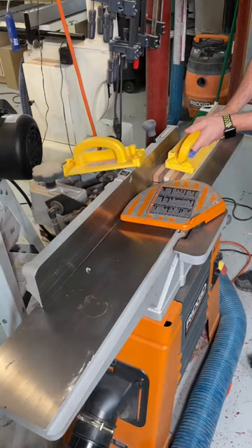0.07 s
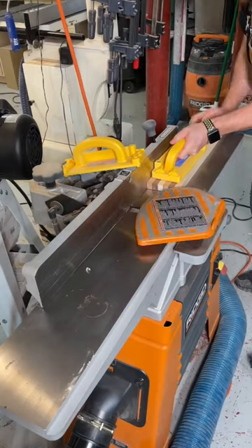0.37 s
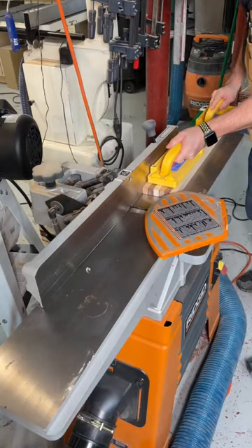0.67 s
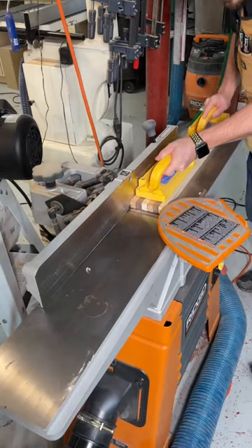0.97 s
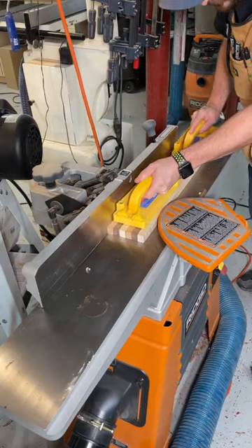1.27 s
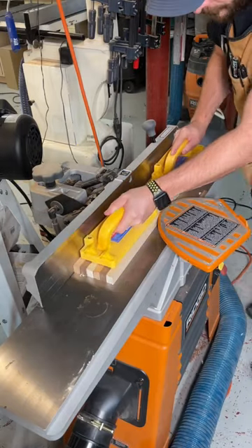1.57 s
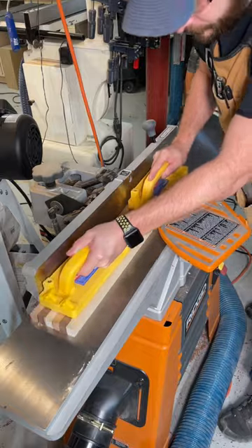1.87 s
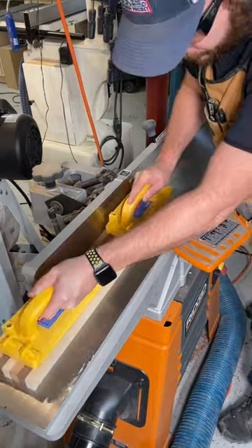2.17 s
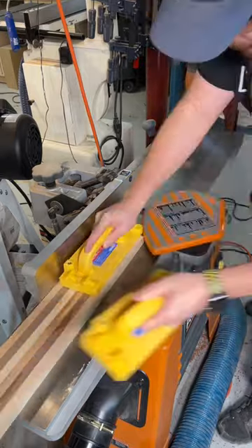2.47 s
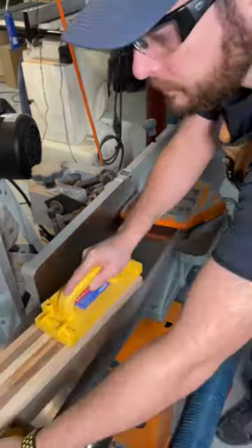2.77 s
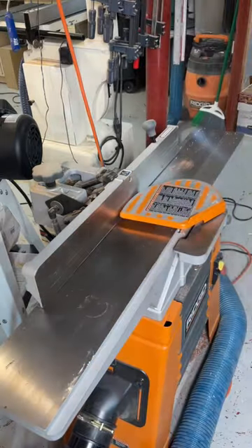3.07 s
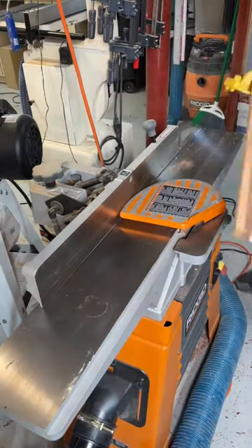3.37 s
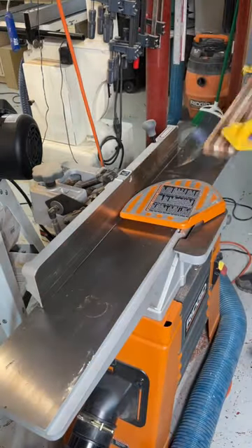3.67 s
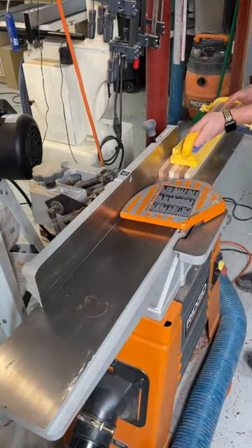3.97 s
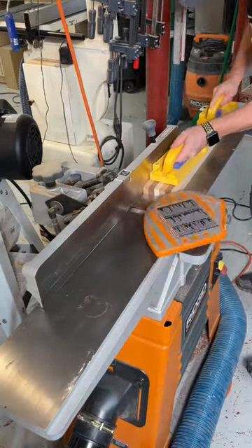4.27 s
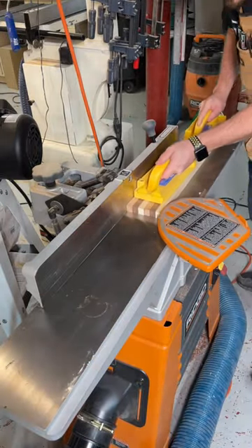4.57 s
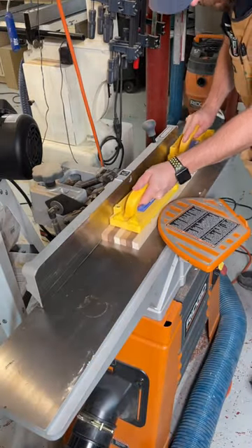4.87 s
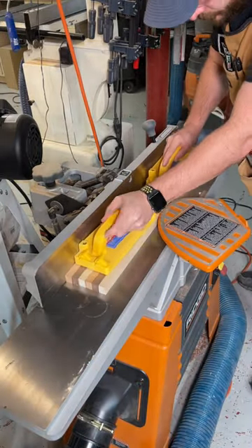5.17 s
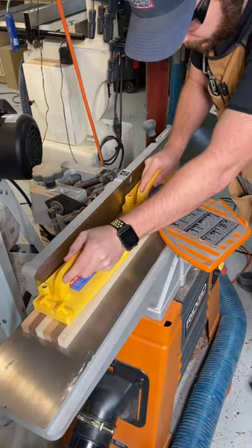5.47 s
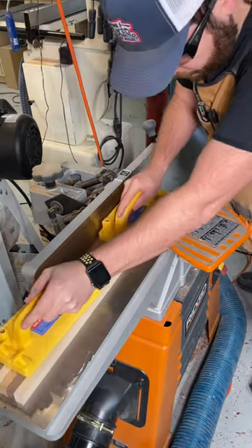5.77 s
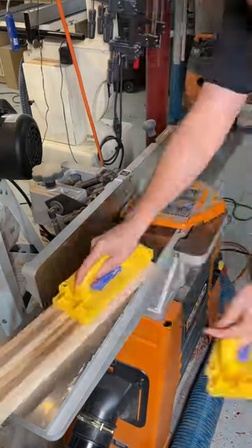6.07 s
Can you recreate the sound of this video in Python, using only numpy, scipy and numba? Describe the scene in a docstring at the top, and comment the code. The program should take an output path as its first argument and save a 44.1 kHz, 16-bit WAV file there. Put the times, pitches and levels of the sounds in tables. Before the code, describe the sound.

A jointer screams through two quick passes on a board over a whining dust collector, sped up, high and thin.

```python
"""A small workshop, with a phone for a microphone: a jointer planes a glued-up board twice.
It is heard sped up, so everything is high and thin. The knives whistle in air and scream in the wood,
over the whine and rush of a dust collector; the guard snaps shut after each pass. The phone's gain
control ducks during the cuts and creeps back up between them."""
import sys
import numpy as np
from scipy import signal
from scipy.fft import rfft, irfft
from scipy.io import wavfile
from scipy.ndimage import uniform_filter1d, map_coordinates
from numba import njit

SR = 44100
rng = np.random.default_rng(int(sys.argv[2]) if len(sys.argv) > 2 else 0)


def transcribe(signal):
    """Save signal, clipped to [-1, 1], as a 16-bit WAV file at the path in sys.argv[1]."""
    frames = np.atleast_2d(signal).T
    limited = np.clip(frames, -1, 1)
    pcm = np.round(limited * 32767).astype(np.int16)
    wavfile.write(sys.argv[1], SR, pcm)


N = 273861
T = np.arange(N) / SR

# The dust collector's impeller. Each row: multiple of the blade rate, level in dB.
IMPELLER_PARTIALS = [(1, -39), (2, -56), (3, -63), (4, -61)]
# Motor hum and frame tones. Each row: frequency in Hz, level in dB.
MOTOR_TONES = [(355.5, -85), (426, -88), (721, -75.5), (1040, -68), (1442, -67), (2880, -56), (3209, -72.5),
               (3520, -72.5), (14314, -60)]
# Air rushing into the hose. Each row: frequency in Hz, relative level in dB.
AIR_SPECTRUM = [(250, -55), (340, -41), (520, -31.5), (750, -15), (1080, -4.5), (1800, -8.5), (2400, -1.5),
                (3700, 4.5), (5400, -3), (7000, -1.5), (8600, -2.5), (9800, -9.5), (12000, -9.5),
                (15500, -11.5)]
# Knives in air. Each row: multiple of the strike rate, relative dB under the guard, and uncovered.
WHISTLE_PARTIALS = [(1, -64.5, -62), (2, -48, -47.5), (3, -50, -50), (4, -54, -54), (5, -48.5, -46),
                    (6, -58.5, -54.5), (7, -57, -52), (8, -60.5, -68.5), (9, -70, -57), (10, -61.5, -57)]
# The guard's swings. Each row: second it is pushed aside, second it is shut again.
GUARD_SWINGS = [(0.348, 2.7), (4.05, 6.065)]
# Guard, push blocks and board knocking. Each row: start in seconds, level in dB, the crack's
# 60 dB decay time in seconds, its low cut in Hz.
KNOCK_EVENTS = [(0.501, -33.5, 0.039, 10000), (0.621, -31, .025, 7000), (2.5846, -11, 0.019, 3930),
                (2.826, -27, 0.0095, 5970), (2.847, -28, .02, 6000), (3.347, -33, .02, 6000),
                (3.5127, -21.5, 0.017, 4790), (3.5483, -23.5, 0.011, 4400), (3.9086, -29, 0.015, 5000),
                (6.0647, -8, 0.013, 4700)]
# Modes of the machine's table and fence. Each row: frequency in Hz, width in Hz, relative level in dB.
MACHINE_MODES = [(4250, 39, -7), (5280, 83, 3.5), (7570, 130, 3.5), (8700, 74, 3), (11200, 140, 4),
                 (11600, 74, -12), (14200, 110, -7)]
# The board's passes. Each row: bite, full cut and exit in seconds, then offsets in dB for the low and
# body registers, the chips, the buzz and the chatter.
BOARD_PASSES = [(1.002, 1.052, 2.340, 1, -1, -4, -6), (4.519, 4.548, 5.875, -3, 0.5, -4.5, 0.5)]
# The cutter head under load, one list a pass. Each row: time in seconds, strike rate in Hz.
LOADED_SPEEDS = [
    [(1.03, 1476.2), (1.05, 1471.5), (1.14, 1471.0), (1.28, 1461.2), (1.35, 1464.9), (1.75, 1459.0),
     (2.05, 1465.9), (2.23, 1463.1), (2.33, 1466.9)],
    [(4.54, 1466.5), (4.61, 1459.0), (4.86, 1446.7), (4.91, 1450.0), (5.05, 1448.9), (5.08, 1455.4),
     (5.22, 1449.7), (5.85, 1454.9), (5.87, 1459.1)],
]
# The scream, one list a register: low, body, middle, top.
# Each row: multiple of the strike rate, level in dB within the register.
SCREAM_PARTIALS = [
    [(2, -15), (3, 0)],
    [(4, 1)],
    [(5, -1), (6, -0.5)],
    [(7, -8), (8, -8), (9, -5.5), (10, -10)],
]
# Course of a cut for those four registers, then the chips. Each row: steady relative level in dB,
# change at the bite in dB, its fade time in seconds, change at the exit in dB.
CUT_ENVELOPES = [(-46.5, 13, 0.42, 5.5), (-37.5, -9, 0.069, 2), (-37, 12, 0.049, -2.5),
                 (-37, 19.5, 0.043, 8), (-46.5, 10, 0.27, 7.5)]
# The push eases or firms, or the knives meet rough grain. Each row: centre in seconds,
# half length in seconds, change of the scream in dB, change of the chips in dB.
PUSH_AND_GRAIN = [(1.175, 0.047, -3, -6), (1.312, 0.063, 4.5, -3), (1.47, 0.11, -3, -0.5),
                  (1.705, 0.14, 0, 5), (1.9, .05, 2, 1), (4.653, 0.047, -3, 4), (4.733, 0.031, -4.5, -9.5),
                  (5.036, 0.1, -2, 0.5), (5.297, 0.17, 2.5, 4.5), (5.713, 0.067, -5, 1)]
# Chips tearing off. Each row: frequency in Hz, relative level in dB.
CHIP_SPECTRUM = [(2000, -16), (3000, -16), (3650, -5.5), (4200, -5), (5100, -0.5), (5600, 0), (6600, 2.5),
                 (7700, -0.5), (9400, 0.5), (10600, -2.5), (12300, 3), (15400, -3.5)]
# Big splinters at the board's ends. Each row: time in seconds, size relative to an average snap.
BIG_SPLINTERS = [(4.566, 2.8), (4.599, 2), (5.836, 2.7), (5.849, 4)]
# Difference between the two microphone ports. Each row: frequency in Hz, side over mid in dB.
PORT_DIFFERENCE = [(300, -26), (700, -45), (1300, -52), (2100, -56), (3000, -14.5), (4300, -11),
                   (6000, -20), (8000, -38.5), (15000, -21)]


def undb(db):
    """Decibels to amplitude."""
    return 10 ** (np.asarray(db) / 20)


def unit(x):
    """Scale to rms 1."""
    return x / np.sqrt(np.mean(x ** 2))


def colour(x, points):
    """Filter by a spectrum of (Hz, dB) points."""
    hz, db = np.transpose(points)
    bins = np.maximum(np.fft.rfftfreq(N, 1 / SR), 1)
    return irfft(rfft(x) * undb(np.interp(np.log(bins), np.log(hz), db)), N)


def highpass(x, hz, order):
    """Butterworth high-pass."""
    return signal.sosfilt(signal.butter(order, hz, "high", fs=SR, output="sos"), x)


def walk(rate):
    """Smooth random wander, `rate` steps a second, spread about 1."""
    steps = rng.standard_normal(N // 10)
    return map_coordinates(steps, [T * rate + 2], order=2, mode="wrap")


def ramp(start_s, length_s):
    """Rise from 0 to 1 over this time."""
    return np.clip((T - start_s) / length_s, 0, 1)


def turning(hz):
    """Phase of something that turns at this rate."""
    return 2 * np.pi * np.cumsum(hz * np.ones(N)) / SR


def tone(phase):
    """A sine of rms 1 that starts anywhere in its cycle."""
    return np.sqrt(2) * np.cos(phase + 2 * np.pi * rng.random())


def whine(phase, partials, sway_db, sway_rate):
    """Harmonics of a rotor; each sways as the worker moves through the sound field."""
    return sum(undb(db + sway_db * walk(sway_rate)) * tone(k * phase) for k, db in partials)


def dust_collector(blade_hz=2139.7, air_db=-40.7):
    """The bed of the room: impeller whine, motor hum and air rushing into the hose."""
    impeller = whine(turning(blade_hz + 0.63 * walk(21)), IMPELLER_PARTIALS, sway_db=0.5, sway_rate=23)
    hum = sum(undb(db + 0.5 * walk(15)) * tone(turning(hz)) for hz, db in MOTOR_TONES)
    air = unit(colour(rng.standard_normal(N), AIR_SPECTRUM)) * undb(air_db + 0.35 * walk(13))
    return impeller + hum + air


def cutter_head(idle_hz=1485.8, recover_s=0.0272):
    """Phase of the knife strikes: the board drags the head down, and it picks up as the board leaves."""
    speeds = [(0, idle_hz)]
    for (bite, _, leave, *_), loaded in zip(BOARD_PASSES, LOADED_SPEEDS):
        speeds += [(bite, idle_hz), *map(tuple, loaded), (leave + recover_s, idle_hz)]
    strike_hz = np.interp(T, *np.transpose(sorted(speeds)))
    return turning(strike_hz + 0.72 * walk(20))


def knife_whistle(phase, gain_db=0.5, open_s=0.18, shut_s=0.057):
    """Knives whistle in air; the guard muffles most upper partials until the board pushes it aside."""
    aside = sum(ramp(opens, open_s) - ramp(shut - shut_s, shut_s) for opens, shut in GUARD_SWINGS)
    partials = [(k, gain_db + covered + aside * (bare - covered))
                for k, covered, bare in WHISTLE_PARTIALS]
    return whine(phase, partials, sway_db=4.5, sway_rate=3.995)


def knocks(ring_db=-9, thud_db=-12, thud_t60=0.049):
    """Each knock is a bright crack that rings the machine's table and leaves a duller, longer tail."""
    out, age = np.zeros(N), T[:SR // 10]
    ring = sum(undb(db) * np.exp(-np.pi * width * age) * np.sin(2 * np.pi * hz * age)
               for hz, width, db in MACHINE_MODES)
    for start_s, db, t60, low_cut_hz in KNOCK_EVENTS:
        crack = rng.standard_normal(len(age)) * undb(-60 * age / t60)
        thud = rng.standard_normal(len(age)) * undb(-60 * age / thud_t60)
        blow = highpass(crack + undb(ring_db) * ring, low_cut_hz, order=4)
        blow += undb(thud_db) * highpass(thud, 1470, order=4)
        start = int(start_s * SR)
        out[start:start + len(age)] += undb(db) * blow[:N - start]
    return out


def scream(phase, partials, beat_depth, detune_hz=0.42):
    """Knives scream in the wood; each partial swells at random and beats slowly, high ones faster."""
    out = np.zeros(N)
    strike = phase + 0.012 * walk(260)
    detuned = strike + turning(detune_hz)
    for k, db in partials:
        swell_db, flicker_db = 2 * walk(4), 0.8 * walk(45)
        partial = (tone(k * strike) + beat_depth * tone(k * detuned)) / np.hypot(1, beat_depth)
        out += undb(db + swell_db + flicker_db) * partial
    return out


def knife_buzz(phase):
    """Three slightly unequal knives repeat once a shaft turn: weak lines between the strong ones."""
    lines = sum(undb(3.5 * walk(6)) * tone(k * phase / 3) for k in range(7, 33) if k % 3)
    return unit(colour(lines, CHIP_SPECTRUM))


def chip_chatter(phase):
    """Chips tend to break on every other strike: ragged lines halfway between the harmonics."""
    lines = np.zeros(N)
    for k in range(2, 10):
        flutter = 1 + 0.35 * walk(50) + 0.7 * walk(380)
        lines += flutter * tone((k + 0.5) * phase + walk(60))
    return unit(colour(lines, CHIP_SPECTRUM)) * undb(1.5 * walk(9))


def splinters(snaps_per_s=110, decay_s=0.0012):
    """Envelope of snapping fibres: many small random bursts, and a few big ones at the board's ends."""
    snaps = (rng.random(N) < snaps_per_s / SR) * np.minimum(rng.exponential(size=N), 3)
    for start_s, size in BIG_SPLINTERS:
        snaps[int(start_s * SR)] += size
    return signal.lfilter([1], [1, -np.exp(-1 / (decay_s * SR))], snaps)


def tearing(phase):
    """The hiss of tearing wood pulses with the strikes and crackles where fibres snap."""
    hiss = rng.standard_normal(N) * (1 + 0.7 * np.cos(phase))
    crackling = hiss * (1 + 1.4 * splinters())
    return unit(colour(crackling, CHIP_SPECTRUM)) * undb(0.6 * walk(70))


def cut_levels(bite, leave, low_db, chips_db, exit_s=0.096):
    """Relative dB of the four registers and the chips; most surge at the board's two ends."""
    age, remaining = np.maximum(T - bite, 0), np.maximum(leave - T, 0)
    push, grain = sum(np.outer(dbs, np.exp(-((T - centre) / half_length) ** 2))
                      for centre, half_length, *dbs in PUSH_AND_GRAIN)
    low, body, middle, top, chips = (
        steady + at_bite * np.exp(-age / fade_s) + at_exit * np.exp(-remaining / exit_s)
        for steady, at_bite, fade_s, at_exit in CUT_ENVELOPES)
    registers = np.array([low + low_db, body + low_db, middle, top]) + push
    return registers, chips + chips_db + grain


def cutting(phase, gain_db=20, first_touch_db=-39.5, clear_db_per_s=2400,
            beat_depths=(0.4, 0.25, 0.65, 0.75)):
    """The knives chop the wood: scream, buzz, chatter and tearing while the board is on them."""
    # each moment belongs to the nearest pass
    nearest = np.argmin([abs(T - (bite + leave) / 2) for bite, _, leave, *_ in BOARD_PASSES], axis=0)
    bite, full, leave, low_db, chip_offset_db, buzz_db, chatter_db = np.array(BOARD_PASSES)[nearest].T
    registers_db, chips_db = cut_levels(bite, leave, low_db, chip_offset_db)
    voice = sum(undb(db) * scream(phase, partials, depth)
                for db, partials, depth in zip(registers_db, SCREAM_PARTIALS, beat_depths))
    buzz = undb(buzz_db + (registers_db[-1] + chips_db) / 2) * knife_buzz(phase)
    chips = undb(chips_db) * (undb(chatter_db) * chip_chatter(phase) + tearing(phase))
    entry_db = first_touch_db * (1 - ramp(bite, full - bite)) ** 2
    clear_s = np.maximum(bite - T, 0) + np.maximum(T - leave, 0)
    contact = undb(gain_db + entry_db - np.minimum(clear_db_per_s * clear_s, 200))
    return contact * (voice + highpass(buzz + chips, 1900, order=4))


def scene(walls_db=-16, walls_t60=0.064):
    """The shop at the phone's two ports: each hears the treble and the walls a little differently."""
    collector, phase = dust_collector(), cutter_head()
    mid = collector + cutting(phase) + knife_whistle(phase) + knocks()
    age = T[:SR // 20]
    tail = rng.standard_normal(len(age)) * undb(-60 * age / walls_t60)
    scatter = signal.fftconvolve(mid, tail / np.linalg.norm(tail))[:N]
    # side lags mid by a quarter cycle, so the ports differ in phase, not in level
    side = colour(signal.hilbert(mid).imag, PORT_DIFFERENCE)
    side += undb(walls_db) * highpass(scatter, 3800, order=6)
    return np.array([mid + side, mid - side])


@njit
def ride_gain(level_db, limit_db, depth_db, attack_s, hold_s, rise_db_per_s, window_db):
    """Gain in dB: drops while the output is over the limit, holds while near it, then creeps back up."""
    out, gain, wait = np.empty(len(level_db)), 0., 0.
    for i in range(len(level_db)):
        over = level_db[i] + gain - limit_db
        wait = hold_s if over > -window_db else wait - 1 / SR
        if over > 0:
            gain = max(gain - over / (attack_s * SR), -depth_db)
        elif wait < 0:
            gain = min(gain + rise_db_per_s / SR, 0.)
        out[i] = gain
    return out


def record(dry, top_hz=15650):
    """Behind the microphone: the phone's gain control, then its treble cut-off."""
    level_db = 10 * np.log10(uniform_filter1d(np.mean(dry ** 2, axis=0), size=200) + 1e-12)
    gain_db = ride_gain(level_db, limit_db=-31.0, depth_db=21.5, attack_s=0.008, hold_s=0.2,
                        rise_db_per_s=9.8, window_db=5.0)
    treble_cut = signal.ellip(10, 0.2, 70, top_hz, fs=SR, output="sos")
    return signal.sosfilt(treble_cut, dry * undb(gain_db))


dry = scene()
out = record(dry)
transcribe(out)
```